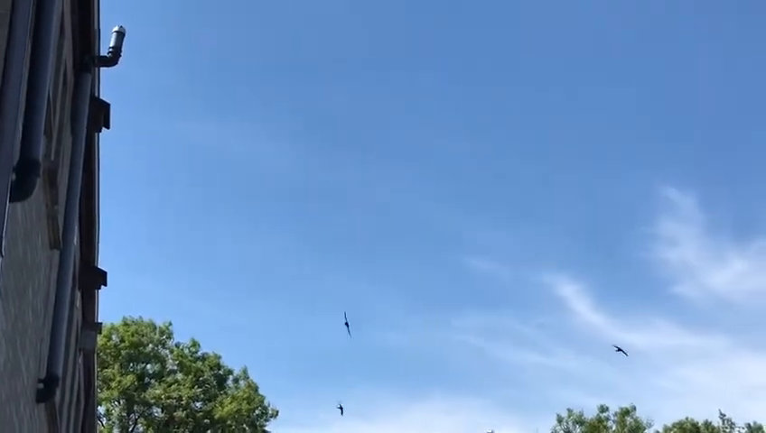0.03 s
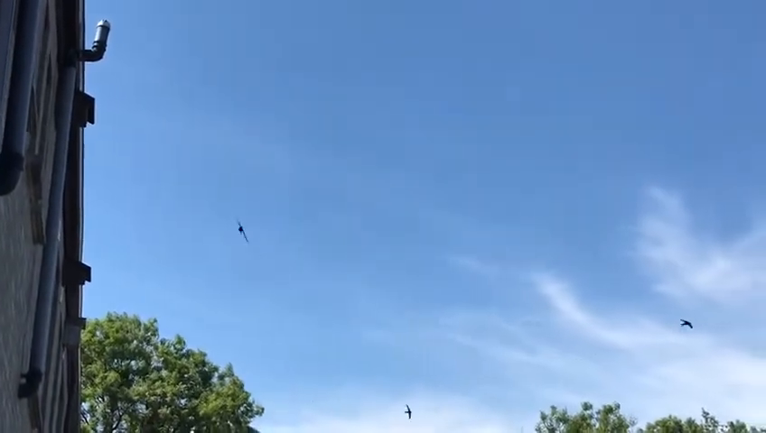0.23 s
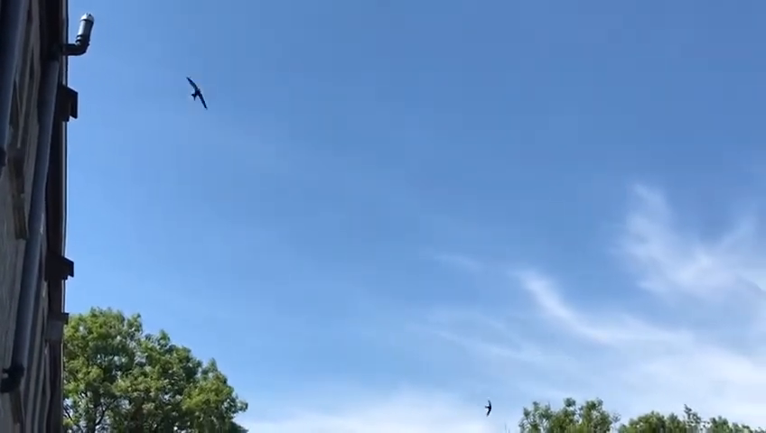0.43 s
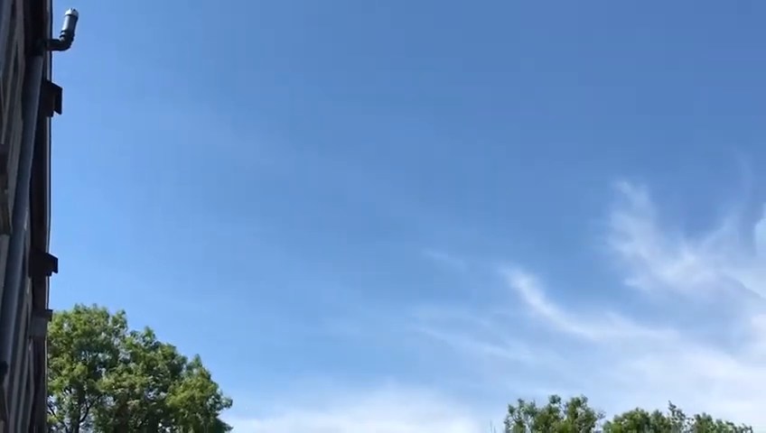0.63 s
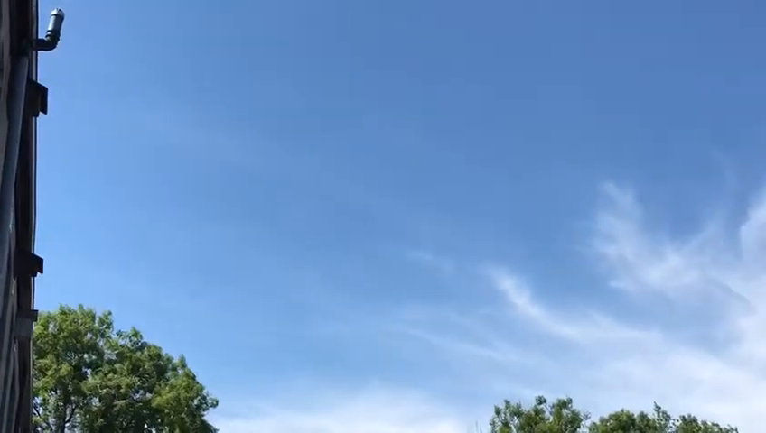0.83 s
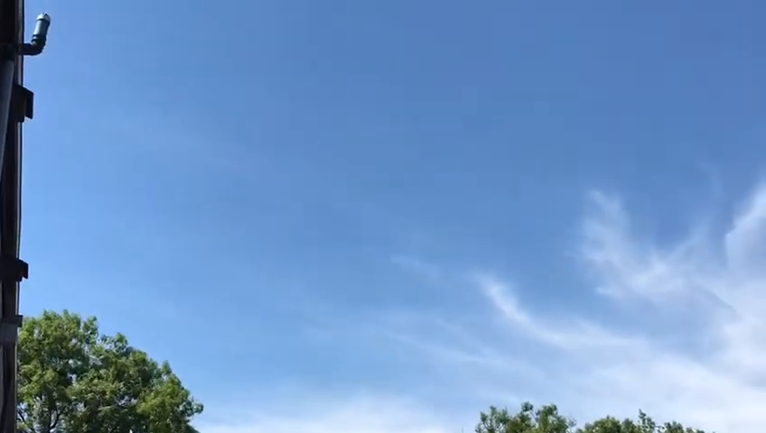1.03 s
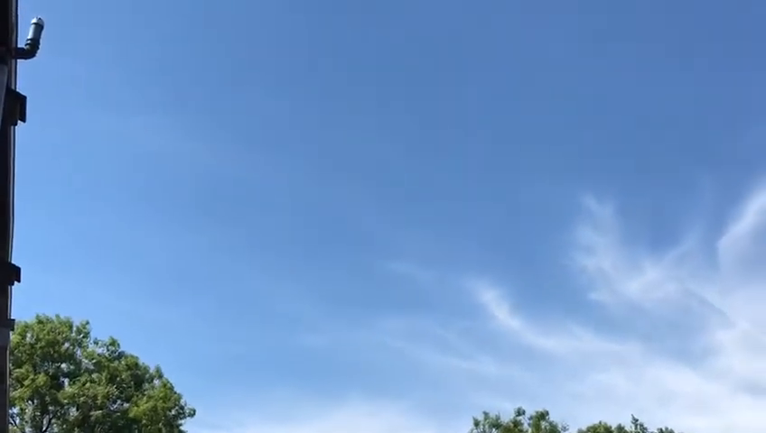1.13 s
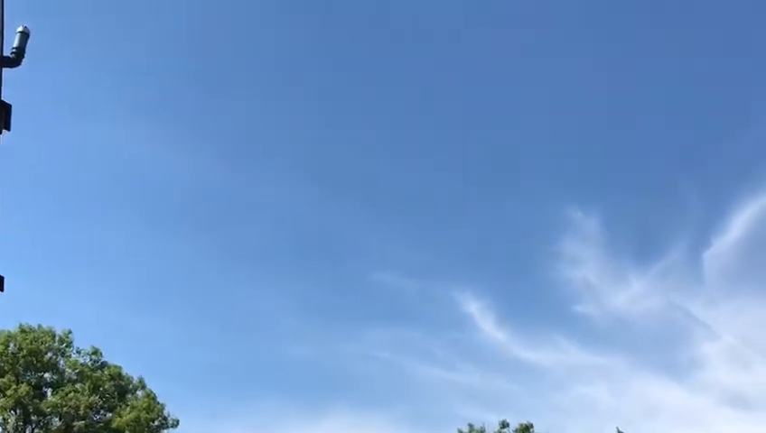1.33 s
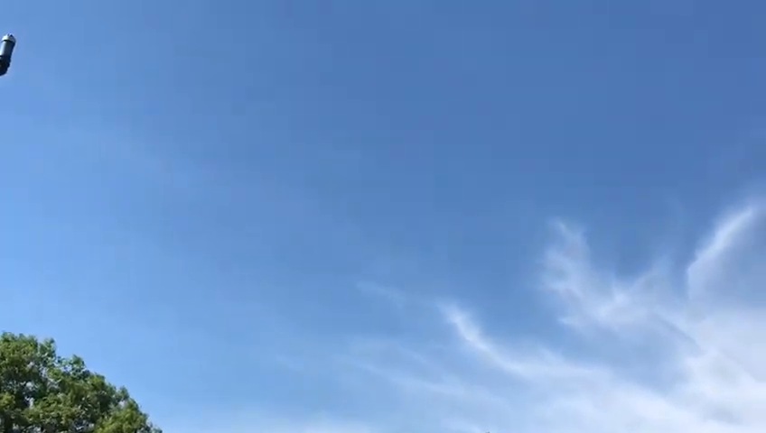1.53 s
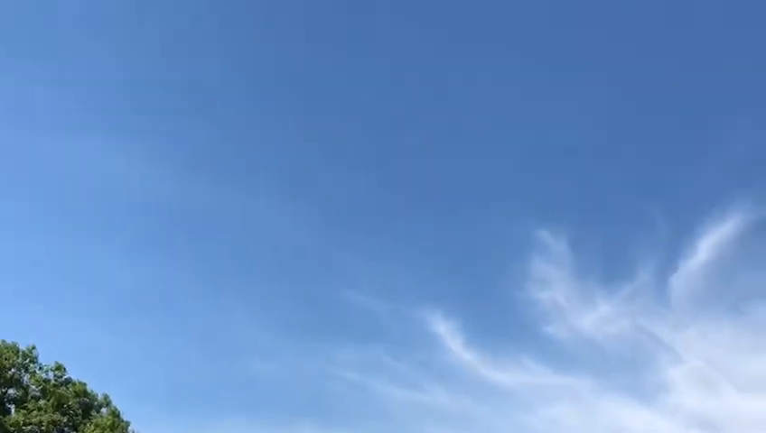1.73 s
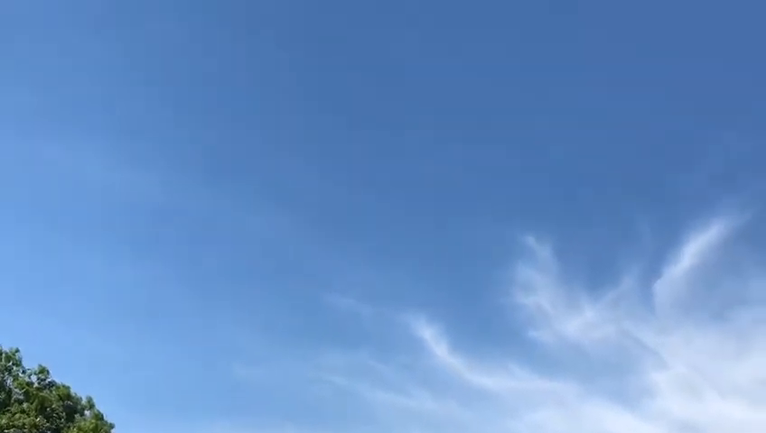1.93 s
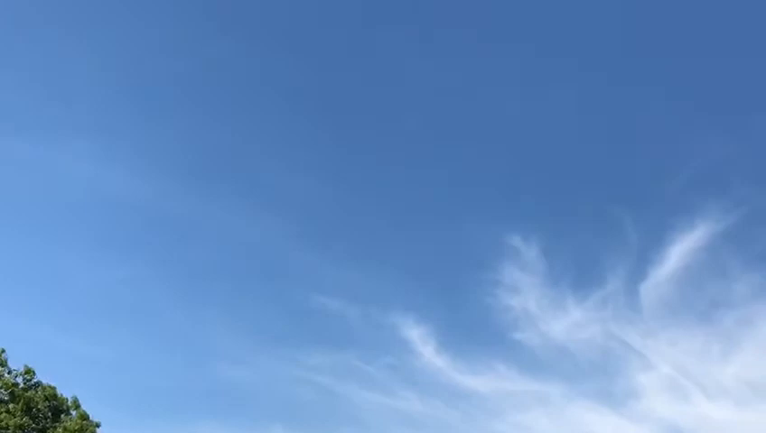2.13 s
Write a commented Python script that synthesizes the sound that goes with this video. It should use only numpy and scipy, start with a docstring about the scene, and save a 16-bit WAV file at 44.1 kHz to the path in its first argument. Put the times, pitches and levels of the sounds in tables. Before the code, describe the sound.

Swifts race past a building, their shrill, buzzing screams overlapping and breaking into short falling notes during the first second; faint wall echoes fade into quiet outdoor hush, with low wind buffeting the microphone.

```python
"""A street of houses: four swifts scream past, overlapping, as a fifth scream is just ending.
Each whistle sweeps up, buzzes with a fast trill of pitch and loudness, and breaks into short sagging notes.
Delayed copies give the wall echoes; decaying noise smears the fainter tail.
Shaped noise makes the wind rumble, one gust and the quiet outdoor hush; push-pull pulses buffet the microphone."""
import sys
import numpy as np
from scipy import signal
from scipy.fft import rfft, irfft, next_fast_len
from scipy.io import wavfile
from scipy.ndimage import map_coordinates

SR = 44100
rng = np.random.default_rng(int(sys.argv[2]) if len(sys.argv) > 2 else 0)


def store_wav(level_fs):
    """Save 16-bit WAV to argv[1]."""
    pcm = np.round(np.clip(np.atleast_2d(level_fs), -1, 1) * 32767)
    wavfile.write(sys.argv[1], SR, pcm.T.astype(np.int16))


N = 97020  # samples, 2.2 s

# Outdoor hush spectrum: frequency_hz, relative_db
HUSH_SPECTRUM = [(120, -16), (200, -1), (377, -14.5), (620, -13.5), (843, -18.5), (919, -14.5), (1670, -24),
                 (3620, -27), (4920, -29.5), (9280, -36), (12000, -36.5), (15600, -73), (22000, -120)]
# Wind rumble level over time: time_s, level_db
RUMBLE_LEVEL = [(0, -44.5), (.05, -47), (.2, -49), (.24, -29.5), (.31, -47), (.36, -43.5), (.44, -34),
                (.47, -43.5), (.58, -38.5), (.76, -44.5), (.81, -27), (.9, -36), (1.01, -46), (1.11, -41),
                (1.19, -48), (1.76, -45), (1.98, -50), (2.07, -40), (2.14, -46.5), (2.2, -35)]
# Wind rumble spectrum: frequency_hz, relative_db
RUMBLE_SPECTRUM = [(21, -36), (35, 4.5), (59, 4), (102, -1), (157, -15), (192, -17.5), (226, -27),
                   (400, -27.5), (520, -42), (880, -120)]
# Gust level over time: time_s, level_db
GUST_LEVEL = [(0.754, -63), (0.773, -30.5), (0.811, -27), (0.851, -37), (0.876, -34), (0.897, -32),
              (.92, -88), (.96, -85)]
# Gust spectrum: frequency_hz, relative_db
GUST_SPECTRUM = [(30, 5), (80, 0), (220, 4), (400, -9.5), (600, -22.5), (900, -45.5), (2000, -55.5)]
# Eddies hitting the microphone: time_s, decay_s, strength_db
PUFFS = [(.776, 0.0028, -24), (.798, 0.0059, -22.5), (0.8117, .003, -8.5), (.836, 0.004, -23),
         (0.8747, 0.0018, -13.5), (0.8943, 0.0027, -24.5)]
# Near-wall reflections: delay_s, gain_db
WALLS = [(.0031, -17.5), (.0074, -22), (0.0148, -20), (.021, -22.5)]
# Filter on the echo tail: frequency_hz, gain_db
TAIL_FILTER = [(3000, -23), (5000, -1), (5600, 2), (6500, -1.5), (7500, -18), (11000, -34)]
# Spectrum of the ending scream's echo: frequency_hz, relative_db
EARLIER_ECHO_SPECTRUM = [(4500, -45), (5600, -1), (6200, 5), (6700, 0), (7300, -26), (9000, -57)]
# Air in the throat: frequency_hz, relative_db
HISS_SPECTRUM = [(2000, -27), (4000, -0.5), (5500, 6), (6900, 4), (7700, 1), (9500, -4), (11200, 5),
                 (12500, -11)]
# Tick opening each trill pulse: frequency_hz, relative_db
TICK_SPECTRUM = [(3500, -41), (5500, -8), (6900, -4), (7700, -10), (9500, -9), (11200, -8), (12500, -24)]
# One scream per table: time_s, pitch_hz, level_db, trill_depth (no unit), hoarseness_db
BUZZING_SCREAM = [(0.161, 4500, -52.5, 0.46, -45), (0.174, 5100, -48, 0.27, -56),
                  (.19, 5407, -38, 0.12, -64), (0.233, 5566, -39.5, 0.16, -65),
                  (0.29, 5452, -41, 0.34, -50), (.395, 5514, -44, 0.53, -48), (.42, 5772, -37, 0.81, -37),
                  (.465, 5920, -37, 0.95, -31), (.49, 5760, -41, 1.07, -36), (0.534, 5880, -41, 1.09, -38),
                  (0.573, 5710, -40.5, 1.1, -46), (0.609, 5830, -44.5, 0.92, -31),
                  (0.644, 6095, -40.5, 0.6, -33), (.695, 6260, -39.5, 0.45, -36),
                  (0.739, 6475, -38.5, 0.21, -35), (.79, 6200, -38.5, 0.57, -40),
                  (0.836, 6365, -41.5, 0.48, -36), (.861, 6370, -49.5, 1.4, -26)]
NEAR_SCREAM = [(0.261, 4296, -49, .1, -35), (.274, 4880, -41.5, .1, -50), (0.29, 5025, -35, 0.087, -48),
               (.311, 4935, -36.5, .1, -24), (.34, 5230, -37, 0.33, -28.5), (.357, 5544, -33, 0.33, -74),
               (0.376, 5713, -32, .2, -65), (0.404, 5774, -33, 0.23, -35), (0.421, 5790, -40, 0.29, -17)]
LOW_SCREAM = [(.541, 4124, -52, .1, -45), (.549, 4600, -46, .1, -45), (0.565, 5020, -41.5, .1, -32),
              (.606, 5175, -37, .1, -26), (0.633, 5086, -37.5, 0.13, -24), (0.664, 5040, -38, 0.088, -26.5),
              (0.694, 5030, -37.5, 0.17, -22), (.703, 4990, -51, .35, -20), (.716, 5140, -41, .3, -27),
              (.73, 5140, -49, .4, -25)]
RISING_SCREAM = [(0.551, 4580, -45.5, 0.076, -47), (0.579, 5290, -42.5, .2, -40),
                 (0.599, 5670, -37.5, .14, -40), (.611, 5840, -37.5, 0.24, -32)]
# One voice per scream: trill_hz, swing_hz (per unit trill depth), octave_db, rasp_db, undertone_db
VOICES = [(244, 302, -20, -21, -5), (291.7, 100, -18, -25, -20), (292, 37, -21.5, -38, -7.5),
          (261.5, 200, -29, -31, -7)]
# Closing notes: start_s, length_s, pitch_hz, level_db, octave_db
CLOSING_NOTES = [(.0005, 0.0031, 6240, -37, -39), (.016, 0.0065, 6110, -40, -46),
                 (0.032, 0.0047, 5970, -40.5, -31), (.050, .005, 5750, -44, -28),
                 (.064, .0076, 5070, -61.5, -27), (0.422, .0058, 5400, -39, -14.5),
                 (0.433, 0.0053, 5310, -41, -25), (0.447, .0055, 5080, -43.5, -18),
                 (.461, 0.0037, 4660, -46, -17), (.475, 0.0038, 4400, -48, -30),
                 (.489, .004, 4182, -49, -32), (0.612, 0.009, 5510, -35, -17.5),
                 (.642, 0.0063, 5820, -32, -12), (.671, 0.0047, 5830, -33, -12),
                 (0.702, 0.0038, 5720, -32.5, -15), (0.728, 0.006, 5450, -42, -21),
                 (0.73, 0.0094, 4910, -46, -9), (0.752, 0.0125, 5277, -41, -17.5),
                 (0.772, .017, 5520, -39.5, -16), (0.8, 0.015, 5510, -39, -12.5),
                 (0.828, 0.012, 5390, -42, -11), (0.852, 0.015, 5130, -49, -14.5),
                 (0.866, 0.0065, 6240, -34.5, -29), (0.882, 0.0068, 6160, -36, -28),
                 (.898, 0.0071, 6350, -32.5, -29), (0.914, 0.0061, 6250, -34, -22),
                 (0.9305, 0.0061, 6040, -36.5, -19), (0.9481, 0.0055, 5800, -34.5, -28),
                 (0.965, 0.0067, 5240, -46.5, -36)]
# Microphone response: frequency_hz, gain_db
MICROPHONE_RESPONSE = [(15, -33), (28, -16), (50, 0.5), (11000, 0), (11700, -7), (12400, -19)]

HUSH_DB = -62.5
PUFF_EDGE_S = 0.00057  # push-to-pull turn
TAIL_DB, TAIL_T60_S, TAIL_ONSET_S = -21, 0.94, 0.12
DOPPLER_SPREAD_HZ = 290  # fast flight smears the echo tail up and down in pitch
EARLIER_ECHO_DB = -59.5
ATTACK_S, RELEASE_S = 0.0033, 0.0017
WAVER_HZ, FLUTTER_DB = 22.5, 1.0  # random pitch and level drift
RASP_WIDTH_HZ, OCTAVE_BLUR_HZ, HALF_BLUR_HZ = 580, 460, 263  # fringes at 1, 2 and 1.5 times the pitch
OCTAVE_BLUR_SHARE = 0.51  # of the octave
HISS_DB = -4.5  # re hoarseness
TRILL_JITTER_SHARE = 0.0135  # of the trill rate
TRILL_EDGE, TRILL_SHUT = 2.18, 0.14  # pulse steepness, cosine threshold
SWING_LEAD_RAD, SWING_SAW, SWING_SCATTER = 0.91, 0.29, 0.15  # lead on loudness; saw and random shares
TICK_LEAD_RAD, TICK_SHARPNESS = 1.44, 6.5
TICK_DB, LEAP_HZ = -14.5, 480  # at trill depth 1
NOTE_SAG_HZ_PER_S = 7400
NOTE_HOARSE_DB, NOTE_RASP_DB, NOTE_UNDERTONE_DB = -15, -20.5, -17.5
TOP_HZ = 12600


def amp(db):
    """Decibels to gain."""
    return 10 ** (np.asarray(db) / 20)


def unit(x):
    """Scale to rms 1."""
    return x / np.sqrt(np.mean(x ** 2) + 1e-20)


def curves(rows):
    """Interpolate each column after the time to one value per sample."""
    time_s, *columns = np.transpose(rows)
    return [np.interp(np.arange(N) / SR, time_s, column) for column in columns]


def wobble(knots_hz, size=N):
    """Smooth random curve through knots_hz random values a second."""
    knots = rng.standard_normal(size + 4)
    return map_coordinates(knots, [np.arange(size) * knots_hz / SR])


def filtered(x, response):
    """Apply a response, a function of frequency in Hz."""
    padded = next_fast_len(len(x) + SR // 10)
    spectrum = rfft(x, padded) * response(np.fft.rfftfreq(padded, 1 / SR))
    return irfft(spectrum, padded)[:len(x)]


def coloured(x, points):
    """Apply (frequency_hz, gain_db) points, interpolated on a log axis."""
    point_hz, gain_db = np.transpose(points)
    return filtered(x, lambda hz: amp(np.interp(np.log(hz + 1), np.log(point_hz + 1), gain_db)))


def noise(points, size=N):
    """Coloured noise of rms 1."""
    return unit(coloured(rng.standard_normal(size), points))


def gate(t, length_s):
    """Rounded attack, hold and release."""
    attack = np.sin(np.pi / 2 * np.clip(t / ATTACK_S, 0, 1))
    release = np.sin(np.pi / 2 * np.clip((length_s - t) / RELEASE_S + .5, 0, 1)) ** 2
    return attack * release


def hush():
    """Steady outdoor background, strongest at low frequencies."""
    return amp(HUSH_DB) * noise(HUSH_SPECTRUM)


def wind():
    """Low rumble, and one gust whose eddies push and then pull on the microphone."""
    t = np.arange(N) / SR
    rumble = amp(curves(RUMBLE_LEVEL)[0]) * noise(RUMBLE_SPECTRUM)
    start_s, end_s = GUST_LEVEL[0][0], GUST_LEVEL[-1][0]
    gust = amp(curves(GUST_LEVEL)[0]) * noise(GUST_SPECTRUM) * gate(t - start_s, end_s - start_s)
    puffs = np.zeros(N)
    for time_s, decay_s, strength_db in PUFFS:
        push_pull = -np.tanh((t - time_s) / PUFF_EDGE_S)
        fade = np.exp(-np.hypot(t - time_s, PUFF_EDGE_S) / decay_s)
        puffs += amp(strength_db) * push_pull * fade
    return rumble + gust + puffs


def tail_decay():
    """Exponential fall of 60 dB per TAIL_T60_S."""
    return amp(-60 * np.arange(N) / SR / TAIL_T60_S)


def earlier_echo():
    """Decaying noise: the ending scream still hangs in the street."""
    return amp(EARLIER_ECHO_DB) * tail_decay() * noise(EARLIER_ECHO_SPECTRUM)


def wall_echoes(x):
    """Delayed copies from a few near walls; each delay is a phase slope."""
    def response(hz):
        return sum(amp(gain_db) * np.exp(-2j * np.pi * hz * delay_s) for delay_s, gain_db in WALLS)
    return filtered(x, response)


def street_tail(x):
    """Faint Doppler-smeared reverberation from the houses around."""
    onset = 1 - np.exp(-np.arange(N) / SR / TAIL_ONSET_S)
    impulse = rng.standard_normal(N) * tail_decay() * onset
    smeared = x * wobble(2 * DOPPLER_SPREAD_HZ)
    echo = signal.fftconvolve(smeared, impulse / np.linalg.norm(impulse))[:N]
    return amp(TAIL_DB) * coloured(echo, TAIL_FILTER)


def fringe(phase, width_hz):
    """Narrow noise that follows a tone, from random quadrature amplitudes."""
    in_phase = wobble(2 * width_hz, len(phase)) * np.sin(phase)
    return in_phase + wobble(2 * width_hz, len(phase)) * np.cos(phase)


def syrinx(pitch_hz, octave_db, hoarse_db, rasp_db, undertone_db):
    """Raspy whistle and octave; hoarseness adds hiss, a half-pitch undertone and a blurred overtone."""
    size = len(pitch_hz)
    phase = 2 * np.pi * np.cumsum(pitch_hz + WAVER_HZ * wobble(350, size)) / SR
    whistle = np.sin(phase) + amp(rasp_db) * fringe(phase, RASP_WIDTH_HZ)
    octave = np.sin(2 * phase) + OCTAVE_BLUR_SHARE * fringe(2 * phase, OCTAVE_BLUR_HZ)
    undertone = amp(undertone_db) * np.sin(phase / 2)
    overtone = fringe(1.5 * phase, HALF_BLUR_HZ) / 2
    hiss = amp(HISS_DB) * noise(HISS_SPECTRUM, size)
    voice = whistle + amp(octave_db) * octave + amp(hoarse_db) * (undertone + overtone + hiss)
    return np.sqrt(2) * voice * amp(FLUTTER_DB * wobble(260, size))  # sqrt(2): plain sine to rms 1


def scream(rows, trill_hz, swing_hz, octave_db, rasp_db, undertone_db):
    """The trill swings pitch and loudness; a deep trill chops the whistle into sharp falling pulses."""
    pitch_hz, level_db, depth, hoarse_db = curves(rows)
    cycle = 2 * np.pi * np.cumsum(trill_hz * (1 + TRILL_JITTER_SHARE * wobble(60.4))) / SR
    pulses = np.exp(depth * np.tanh(TRILL_EDGE * (np.cos(cycle) - TRILL_SHUT)))
    pulses /= np.sqrt(np.i0(2 * depth))  # offsets the level rise with depth
    opening = np.exp(TICK_SHARPNESS * (np.cos(cycle + TICK_LEAD_RAD) - 1))
    # pitch jumps up and slides down
    lead = cycle + SWING_LEAD_RAD
    swing_shape = np.cos(lead) - SWING_SAW * np.sin(2 * lead) + SWING_SCATTER * wobble(300)
    swing = swing_hz * depth * swing_shape
    leap = LEAP_HZ * depth ** 2 * (opening - opening.mean())
    voice = syrinx(pitch_hz + swing + leap, octave_db, hoarse_db, rasp_db, undertone_db)
    ticks = amp(TICK_DB) * depth ** 4 * opening * noise(TICK_SPECTRUM)
    start_s, end_s = rows[0][0], rows[-1][0]
    envelope = gate(np.arange(N) / SR - start_s, end_s - start_s) * amp(level_db)
    return envelope * (pulses * voice + ticks)


def closing_notes():
    """Short sagging whistles that end each scream; the brighter ones are also hoarser."""
    out = np.zeros(N)
    t = np.arange(SR // 20) / SR
    for start_s, length_s, pitch_hz, level_db, octave_db in CLOSING_NOTES:
        sagging_hz = pitch_hz - NOTE_SAG_HZ_PER_S * (t - length_s / 2)
        hoarse_db = NOTE_HOARSE_DB + octave_db / 2
        note = syrinx(sagging_hz, octave_db, hoarse_db, NOTE_RASP_DB, NOTE_UNDERTONE_DB)
        start = round(start_s * SR)
        out[start:start + len(t)] += amp(level_db) * gate(t, length_s) * note
    return out


def scene():
    """Swifts echoing between the houses, wind and hush."""
    screams = [BUZZING_SCREAM, NEAR_SCREAM, LOW_SCREAM, RISING_SCREAM]
    birds = sum(scream(rows, *voice) for rows, voice in zip(screams, VOICES)) + closing_notes()
    street = birds + wall_echoes(birds) + street_tail(birds) + earlier_echo()
    return (street + wind() + hush())[None]


def record(dry):
    """The microphone loses the deepest bass and top treble; nothing is kept from TOP_HZ up."""
    heard = coloured(dry[0], MICROPHONE_RESPONSE)
    return filtered(heard, lambda hz: hz < TOP_HZ)[None]


dry = scene()
out = record(dry)
store_wav(out)
```